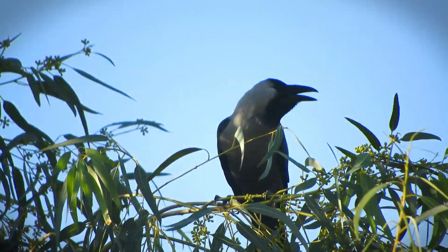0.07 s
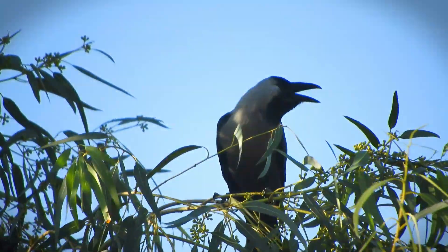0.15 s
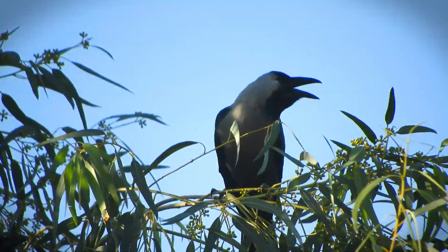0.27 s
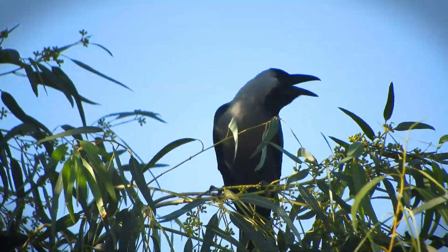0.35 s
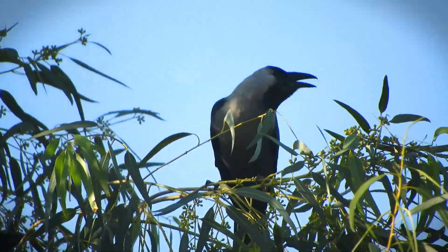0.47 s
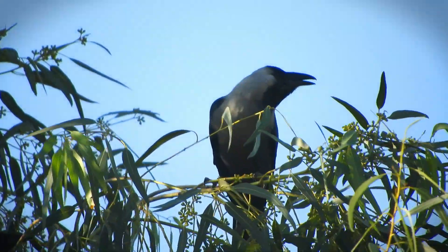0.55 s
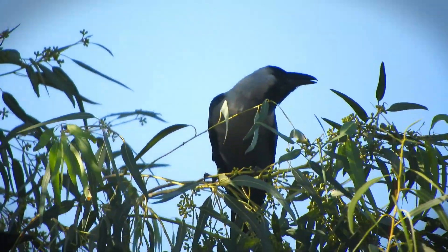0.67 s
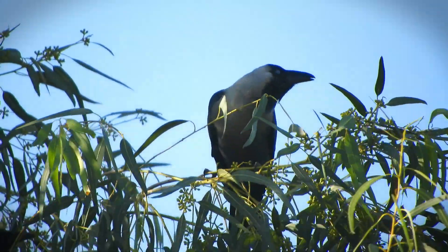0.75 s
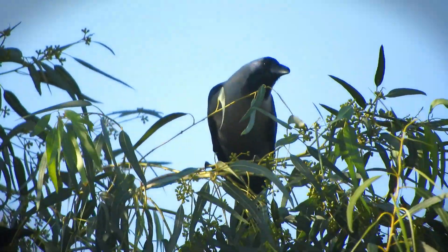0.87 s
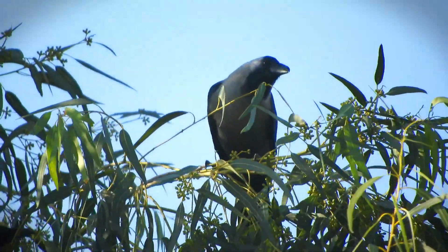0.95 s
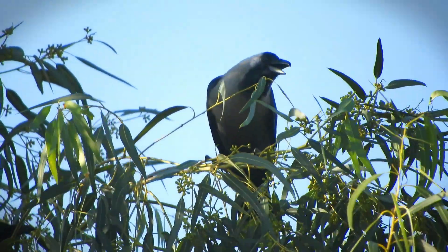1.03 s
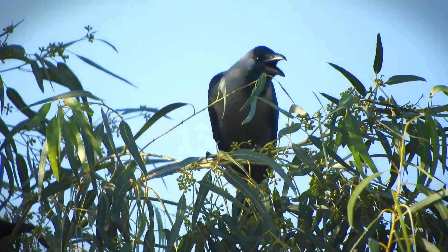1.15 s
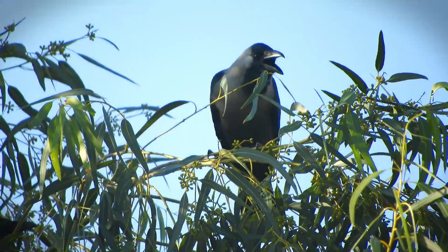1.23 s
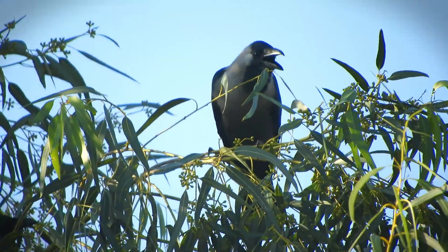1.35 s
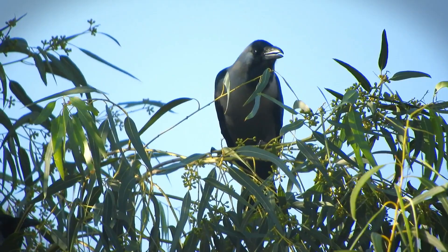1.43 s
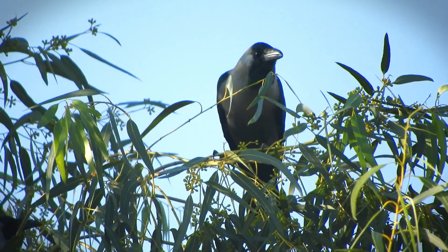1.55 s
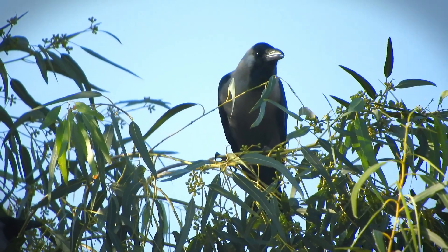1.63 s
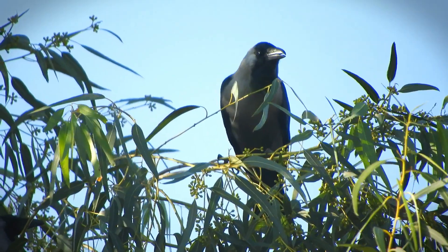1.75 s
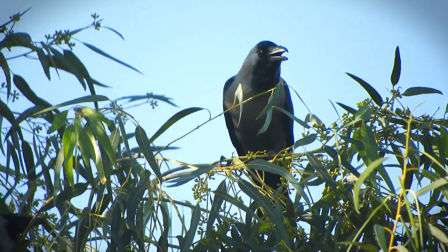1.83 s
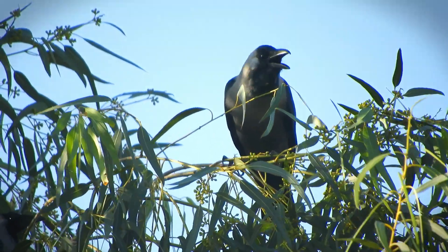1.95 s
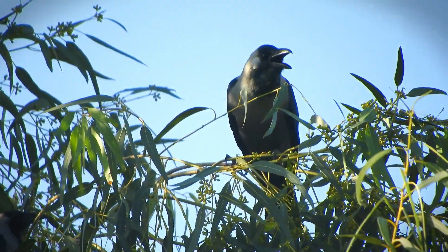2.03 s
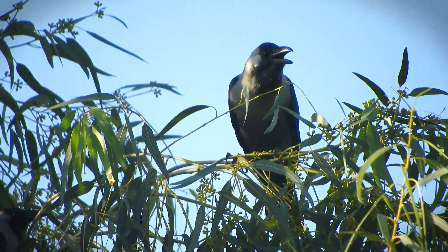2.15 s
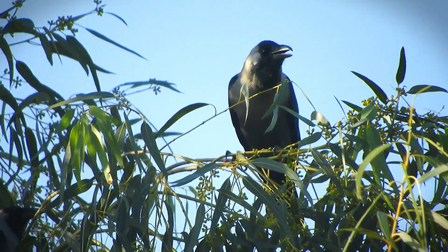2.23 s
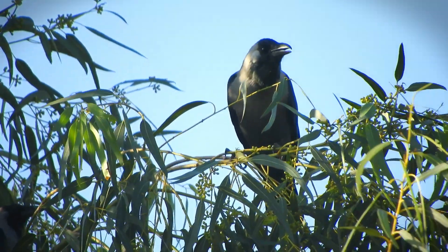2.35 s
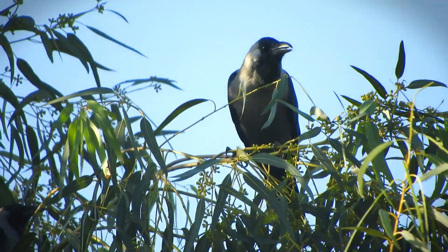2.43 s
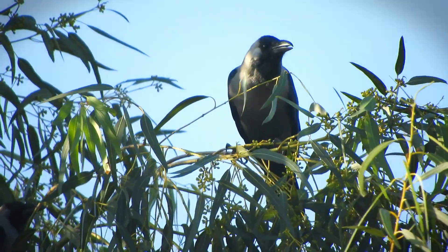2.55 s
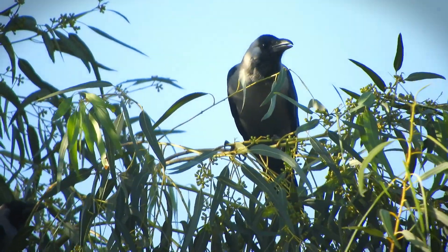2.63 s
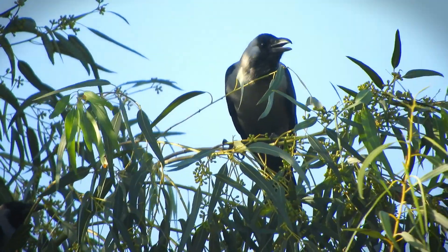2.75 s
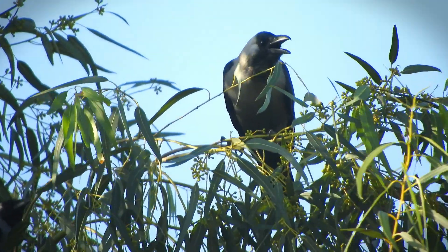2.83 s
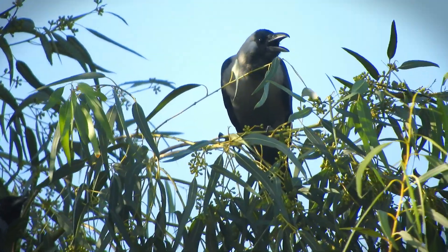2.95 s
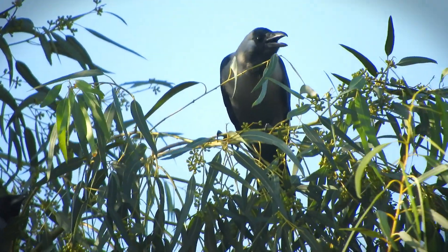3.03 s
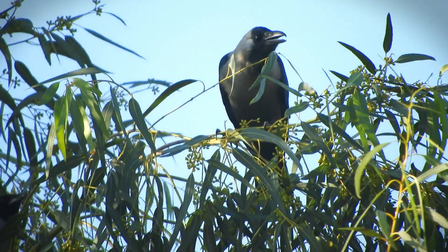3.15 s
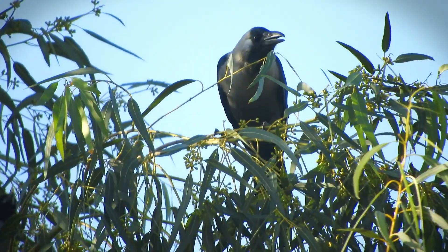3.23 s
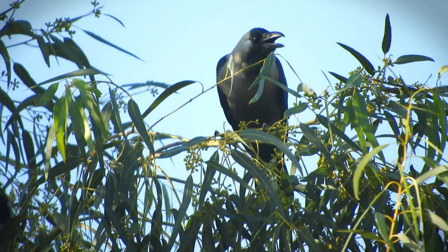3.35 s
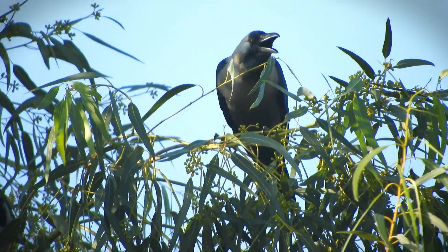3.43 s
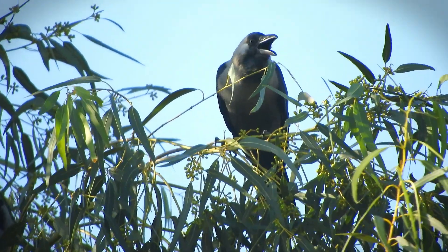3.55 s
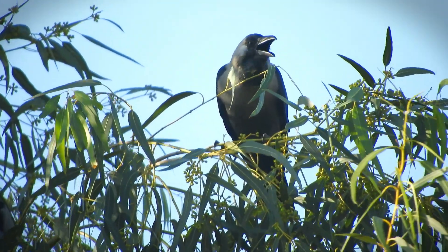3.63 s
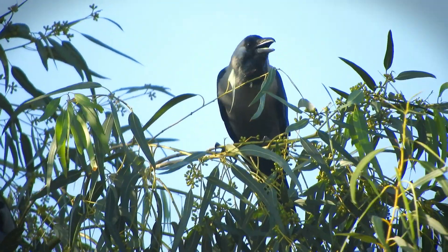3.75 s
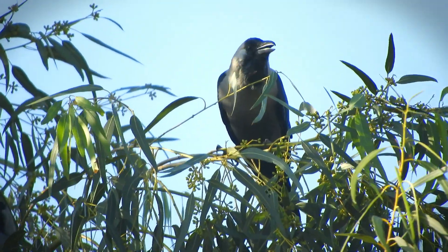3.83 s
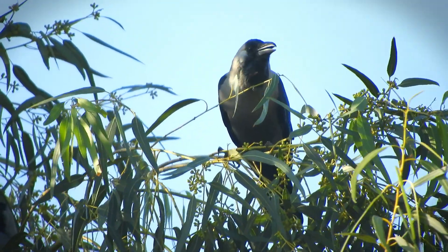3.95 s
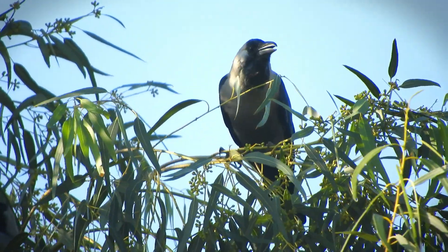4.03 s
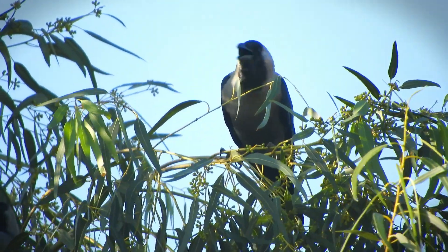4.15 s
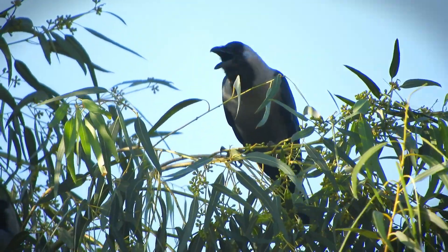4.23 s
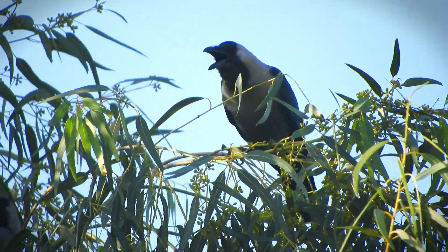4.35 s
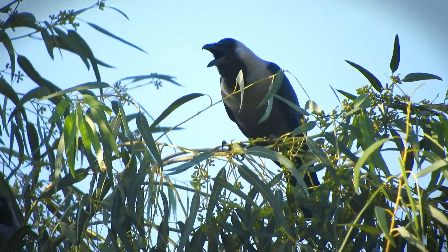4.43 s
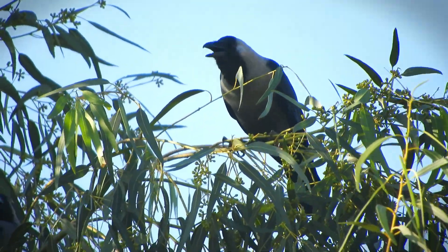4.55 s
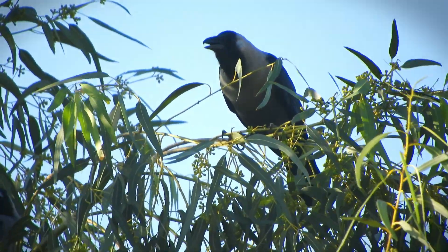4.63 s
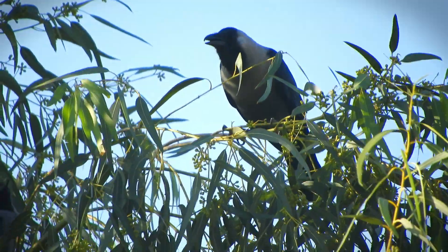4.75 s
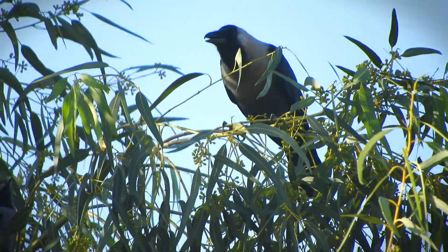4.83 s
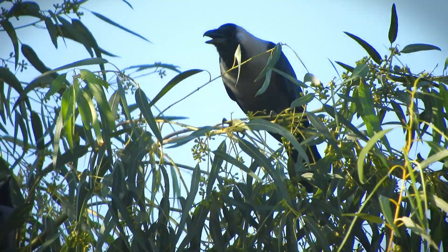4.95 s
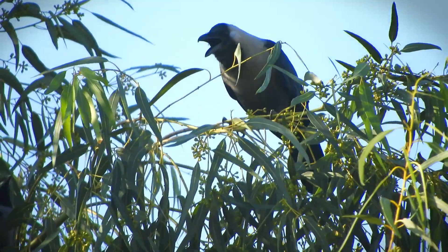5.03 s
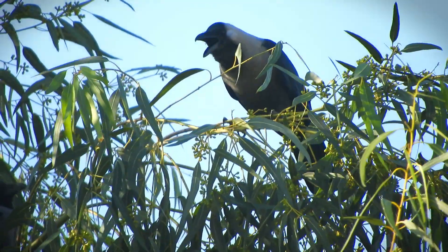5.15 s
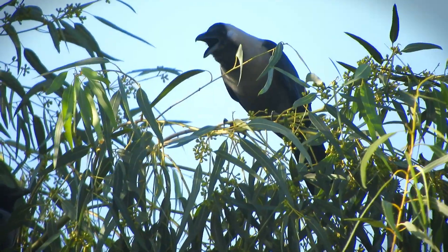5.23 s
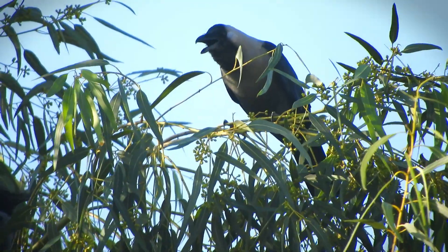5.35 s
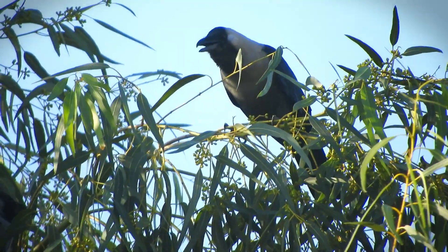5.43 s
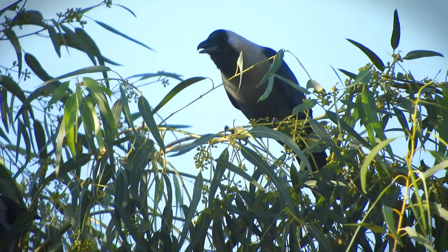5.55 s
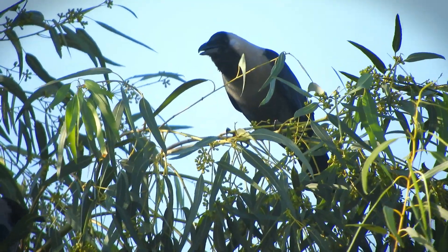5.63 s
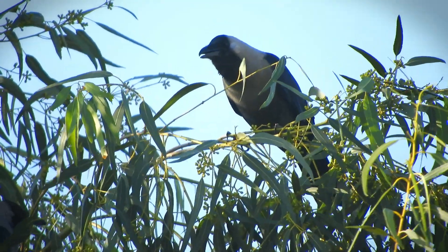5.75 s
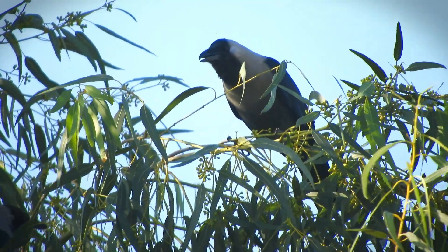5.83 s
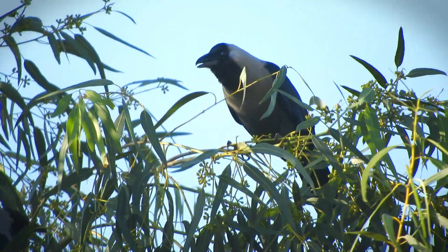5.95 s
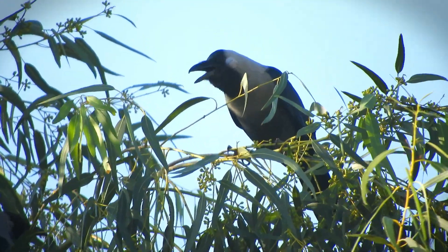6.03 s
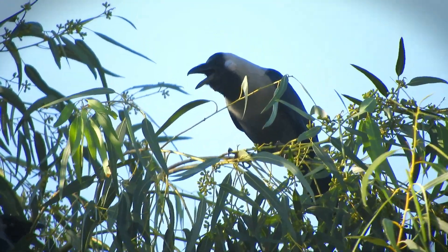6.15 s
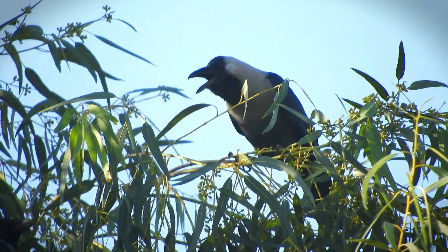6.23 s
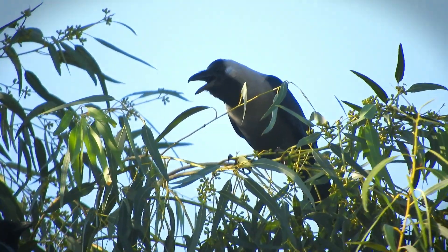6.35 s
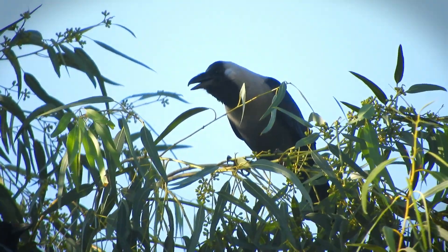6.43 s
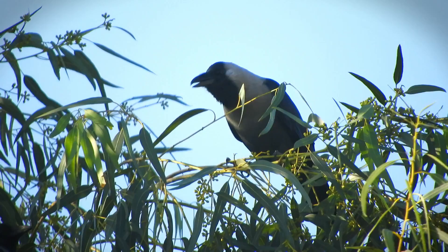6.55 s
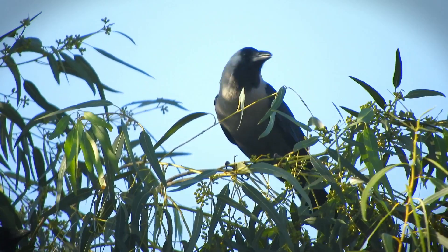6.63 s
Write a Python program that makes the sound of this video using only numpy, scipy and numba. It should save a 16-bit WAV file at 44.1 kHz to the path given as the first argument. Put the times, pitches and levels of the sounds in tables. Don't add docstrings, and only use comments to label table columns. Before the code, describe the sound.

Outdoors, hoarse fluttering crow caws, each around a quarter to half a second, come from straight ahead. They start moderate, pause briefly, build to the loudest cries around four seconds, then crowd together until the end. Thin, bright sparrow chirps and small whistles fill the gaps; very faint distant bird calls and dove coos sit behind. Soft wing puffs, a low traffic hum and leaf hiss complete the slightly echoing stereo scene.

```python
import sys
import numpy as np
from scipy import signal
from scipy.fft import rfft, irfft, next_fast_len
from scipy.io import wavfile
from scipy.ndimage import uniform_filter1d
from numba import njit

SR = 44100
rng = np.random.default_rng(int(sys.argv[2]) if len(sys.argv) > 2 else 0)


def unload_audio(sound):
    columns = np.transpose(np.atleast_2d(sound))
    steps = np.round(np.clip(columns, -1, 1) * 32767)
    wavfile.write(sys.argv[1], SR, steps.astype(np.int16))


def boost(x):
    u = np.asarray(x, float) / 20
    return 10 ** u


N = 294588

# start_s, crest_s, end_s, crest_hz, crest_db
CAWS = [(0.052, 0.189, .41, 387, -28.5), (0.307, 0.521, .69, 404.3, -23.5), (1.219, 1.44, 1.6, 402.5, -23),
        (1.36, 1.567, 1.75, 418, -24), (1.895, 2.101, 2.28, 434.2, -22.5), (2.117, 2.219, 2.4, 401.3, -23),
        (2.477, 2.72, 2.84, 434.6, -22.5), (2.97, 3.218, 3.39, 450.7, -19.5),
        (3.491, 3.798, 3.97, 455.7, -15.5), (3.997, 4.243, 4.35, 432.8, -21),
        (4.248, 4.484, 4.58, 443.2, -13.5), (4.453, 4.573, 4.76, 425.8, -20),
        (4.659, 4.877, 5.06, 454.5, -19), (4.946, 5.037, 5.24, 424, -24), (5.13, 5.392, 5.51, 424.6, -17.5),
        (5.4, 5.523, 5.745, 443, -18.5), (5.706, 5.853, 6.0, 402.5, -24.5),
        (6.076, 6.304, 6.51, 449.8, -18.5), (6.33, 6.434, 6.65, 405, -23.5), (6.6, 6.69, 6.9, 399.5, -36)]
# voice_cycles_per_flutter, throat_hz, final_pitch_drop_0_to_1, windpipe_db, hiss_db
CAW_VOICES = [(5.3, 1757, .14, -19.5, -19), (5.5, 1695, 0.3, -20, -28), (5.4, 1624, 0.02, -23, -24),
              (5.3, 1815, .13, -16.5, -17), (5.4, 1766, 0, -15.5, -17), (6.8, 1690, 0.4, -22, -23.5),
              (5.2, 1780, 0.4, -15, -18), (5.9, 1797, .06, -16.5, -17.5), (5.75, 1828, 0, -16, -19.5),
              (5.3, 1810, .06, -10.5, -23), (5.6, 1796, 0, -13, -23.5), (5.4, 1740, .07, -22, -24),
              (4.3, 1880, .12, -13, -23.5), (3.4, 1804, 0, -16, -20), (7.1, 1702, 0.4, -16, -23),
              (6.4, 1840, .12, -14, -23), (6.4, 1796, 0, -17.5, -16), (5.8, 1790, 0.2, -13, -24.5),
              (4.1, 1870, 0.4, -28, -21.5), (4.9, 1520, .01, -18, -18)]
CAW_ROUGHNESS = [.45, .16, .24, .34, .4, .28, .45, .36, .44, .18, .32, .28, .17, .32, .34, .18, .26, .18,
                 .3, .35]
# share_of_throat_hz, width_hz, level_db
THROAT = [
    (1.0, 300, 5.5),
    (1.24, 315, -7.5),
    (1.55, 583, -19.5),
]
# pitch_hz, level_db (per Hz)
BREATH_HISS = [(1650, -23), (2800, -23), (3550, -12.5), (3840, -5), (5890, -4), (8070, -10), (10000, -17.5),
               (13500, -25), (15500, -56)]
# time_s, pitch_hz
SPARROW_SYLLABLES = [
    [(0, 3300), (.004, 5300), (.008, 6400), (.013, 5000), (.018, 4900)],
    [(.023, 3600), (.031, 4850), (.04, 4950), (.045, 4150), (.05, 4400), (.055, 3150), (.059, 3850),
     (.064, 3200)],
    [(.063, 3200), (.072, 4000), (.086, 4150), (.102, 3150)],
]
# time_s, pitch_hz, level_db
HOOK_CHIRP = [(0, 3700, -18), (.005, 5000, -3), (.009, 5400, 0), (.02, 3700, -3), (.03, 3150, -1),
              (.043, 3800, -3), (.053, 3100, -4), (.062, 2300, -15)]
# time_s, pitch_hz, level_db
SLIDE_CHIRP = [(.02, 4900, -14), (.045, 3400, -4), (.062, 2700, -5), (.078, 2550, 0), (.117, 2550, -2),
               (.125, 2300, -6), (.14, 1950, -5), (.148, 2100, -20)]
# start_s, stretch_factor, pitch_factor, pause_before_arch_s, level_db
SPARROW_PHRASES = [(1.028, .96, .86, .016, -24), (1.922, .98, 1.01, 0, -23), (2.865, 1.01, .94, .003, -24),
                   (5.512, 1.07, 1.01, .003, -21), (5.977, .94, 1.02, 0, -22.5), (6.47, 1.01, .93, 0, -23)]
# start_s, stretch_factor, pitch_factor, level_db
HOOKS_SUNG = [(.007, 1.1, 1, -27), (3.973, 1, 1, -27), (3.213, .85, .92, -29)]
# start_s, stretch_factor, pitch_factor, level_db
SLIDES_SUNG = [(2.375, .9, 1, -43), (5.335, .85, 1, -27), (5.917, 1, 1, -26)]
# start_s, length_s, start_hz, end_hz, level_db
WHISTLES = [(.005, .028, 2650, 2600, -33), (.318, .042, 7500, 3200, -28), (1.021, .01, 3150, 3300, -36),
            (1.087, .014, 3250, 3450, -28), (2.94, .03, 3850, 3300, -30), (4.7, .02, 5200, 4100, -34),
            (4.72, .025, 3850, 3350, -27), (5.055, .05, 3550, 3350, -31), (5.785, .025, 2900, 2850, -31),
            (6.05, .03, 4950, 4100, -29), (6.51, .07, 2800, 2800, -34)]
# start_s, length_s, ends_hz, middle_hz, level_db
ARCHED_WHISTLES = [(.382, .042, 3150, 4400, -27), (3.465, .045, 2950, 2700, -38),
                   (4.755, .018, 2400, 2750, -28), (4.775, .018, 2400, 2750, -27),
                   (4.797, .02, 2450, 2800, -29), (4.96, .03, 3000, 4900, -27),
                   (5.0, .035, 2800, 3500, -36), (5.045, .055, 3150, 2850, -35),
                   (5.115, .035, 3400, 2900, -33)]
# start_s, length_s, start_hz, end_hz, level_db, strongest_overtone (number)
FAR_CALLS = [
    (1.74, .2, 690, 740, -43, 1.3),
    (2.28, .34, 845, 835, -38, 2.6),
    (2.83, .19, 800, 790, -39, 1.7),
    (2.85, .22, 3150, 3110, -47, 1),
    (2.4, .2, 3400, 3380, -56, 1),
]
# start_s, level_db, pitch_hz, length_s
COOS = [(0.706, -38.5, 349, 0.055), (1.196, -40, 383, 0.054), (1.319, -34.5, 380, 0.055),
        (4.359, -45, 368, 0.059), (4.412, -30.5, 379, 0.056), (5.07, -30.5, 384, 0.046),
        (5.698, -35.5, 376, 0.09), (6.118, -28.5, 366, 0.042)]
# start_s, level_db
WING_BEATS = [(0.712, -65), (5.198, -27), (5.217, -26), (5.242, -32.5), (5.339, -30), (5.36, -41),
              (6.138, -35)]
# pitch_hz, level_db (per Hz)
TOWN_HUM = [(15, -69), (25, -18.5), (86, -3), (145, -4.5), (193, 2.5), (237, -15), (357, -10), (622, -18.5),
            (663, -13), (1100, -44), (1430, -65), (2420, -120)]
# pitch_hz, level_db (per Hz)
TOWN_SIDE = [(15, -63), (25, -16), (75, -17), (132, -1.5), (215, -11.5), (825, -12), (2000, -10),
             (6900, -17.5), (15500, -34.5)]
# pitch_hz, level_db (per Hz)
LEAVES = [(530, -38), (900, -3), (1650, 3), (2720, -7.5), (3620, -4.5), (7400, -8), (7940, -9.5),
          (15500, -28)]
# time_s, level_db (above the hum)
RUMBLES = [
    (.12, 2),
    (5.24, 7),
]

ATTACK_S, RELEASE_S, SWELL_DB, SAG_DB = 0.073, 0.067, 13, 10.5
CLIMB_PER_S2 = 2.9
EDGE_DB = -7
EARLY_HISS_DB, LATE_HISS_DB, LATE_PIPE_DB = -5, -3, 3.5
FLUTTER_DEPTH = .085
GAP_DEPTH, GAP_SHARPNESS = 1.05, 3.5
OVERTONE_SPREAD = .9
BREATH = 1.6
WINDPIPE_WIDTH_HZ, THIRD_WIDTH_HZ = 200, 260
THIRD_DB, THIRD_DB_PER_ROUGH = -17, 10
BEAK_HZ, BEAK_WIDTH_HZ = 4300, 220
BEAK_DB, BEAK_DB_PER_ROUGH = 4, -31.5
HISS_OVERTONE, HISS_WIDTH_HZ, HISS_OPEN_DB = 14.07, 7300, -4
TOWN_DB, TOWN_SIDE_DB, LEAVES_DB, RUMBLE_S = -44.5, -50.5, -50, 0.044
ECHO_T60_S, ECHO_DB, FAR_ECHO_DB = 0.67, -15, -11
ECHO_SIDE_DB, ECHO_SIDE_SLOPE_DB = -17, -2.5


def unit(x):
    return x / np.sqrt(np.mean(x ** 2))


def ring(x, hz, width):
    b, a = signal.iirpeak(hz, hz / width, fs=SR)
    return signal.lfilter(b, a, signal.lfilter(b, a, x))


@njit
def moving_ring(x, hz, width):
    y = x.copy()
    for _ in range(2):
        band, low = 0., 0.
        for i in range(len(x)):
            g, damping = np.tan(np.pi * hz[i] / SR), width / hz[i]
            v = (band + g * (y[i] - low)) / (1 + g * (g + damping))
            band = 2 * v - band
            low = low + 2 * g * v
            y[i] = damping * v
    return y


def coloured(spectrum):
    hz, db = np.transpose(spectrum)
    size = next_fast_len(N)
    bins = np.arange(size // 2 + 1) * SR / size + 1
    gain = boost(np.interp(np.log(bins), np.log(hz), db))
    return unit(irfft(rfft(rng.standard_normal(size)) * gain, size)[:N])


def walk(rate):
    hold = int(SR / rate)
    steps = np.repeat(rng.standard_normal(N // hold + 1), hold)
    return unit(uniform_filter1d(uniform_filter1d(steps, hold), hold)[:N])


def add(out, x, s):
    i = int(s * SR)
    out[i:i + len(x)] += x[:N - i]


def caw(call, voice, rough, chance):
    start, crest, end, crest_hz, crest_db = call
    cycles, throat_hz, fall, pipe_db, hiss_db = voice
    first = int(start * SR)
    t = np.arange(first, min(int(end * SR), N)) / SR
    jitter, wander, shimmer, breath, hiss = chance[:, first:][:, :len(t)]

    before = np.clip((crest - t) / (crest - start), 0, 1) ** 2.2
    after = np.clip((t - crest) / (end - crest), 0, 1) ** 2.1
    hz = crest_hz * (1 - CLIMB_PER_S2 * (crest - start) ** 2 * before - fall * after)
    edge_db = EDGE_DB * (before + after)
    beak_db = BEAK_DB + BEAK_DB_PER_ROUGH * rough
    third_db = THIRD_DB + THIRD_DB_PER_ROUGH * rough
    rough = rough * (1 + 0.83 * (before + after))
    least_rough = rough.min()

    flutter = 2 * np.pi * np.cumsum(hz / cycles * (1 + 0.1155 * rough * wander)) / SR
    swing = FLUTTER_DEPTH * np.sin(flutter) + 0.038 * np.sin(2 * flutter + 0.033)
    unsteady = 0.0756 * rough * jitter + 0.0303 * rough * wander
    phase = 2 * np.pi * np.cumsum(hz * (1 + swing + unsteady)) / SR

    gap = np.clip(GAP_DEPTH - rough, 0, 1) * np.exp(GAP_SHARPNESS * (np.cos(flutter + 2.39) - 1))
    strength = (1 - gap) * boost(3.47 * rough * shimmer)
    tones = unit(sum(np.cos(k * phase + OVERTONE_SPREAD * k ** 2) for k in range(2, 12)))
    source = strength * (tones + BREATH * rough * breath)

    centre = throat_hz * (hz / crest_hz) ** 0.51 * (1 + 0.081 * rough * wander)
    throat = 0
    for k, (share, width, db) in enumerate(THROAT):
        level = boost(db + min(k, 1) * edge_db)
        throat = throat + (-1) ** k * level * moving_ring(source, share * centre, 1. * width)
    third = unit(moving_ring(source, 3 * hz, THIRD_WIDTH_HZ + 500 * least_rough))
    throat = unit(throat) - boost(third_db + edge_db) * third
    pipe = unit(moving_ring(source, (2 - 0.52 * least_rough) * hz, WINDPIPE_WIDTH_HZ + 700 * least_rough))

    puffs = (1 + .3 * np.cos(flutter - 1.5)) * (1 + .2 * np.cos(phase)) * boost(1.5 * rough * shimmer)
    air = moving_ring(hiss, HISS_OVERTONE * hz, 1. * HISS_WIDTH_HZ) + boost(HISS_OPEN_DB) * hiss
    beak = unit(ring(source * puffs, BEAK_HZ, BEAK_WIDTH_HZ))
    top = unit(puffs * air) + boost(beak_db - 1.5) * beak

    ramp = np.clip(np.minimum((t - start) / ATTACK_S, (end - t) / RELEASE_S), 0, 1)
    fade = np.sin(np.pi / 2 * ramp) ** 2
    effort = fade * boost(crest_db - SWELL_DB * before - SAG_DB * after)
    pipe_level = boost(pipe_db + EDGE_DB * before + LATE_PIPE_DB * after)
    top_level = boost(hiss_db + 4.0 + EARLY_HISS_DB * before + LATE_HISS_DB * after)
    return effort * (throat + pipe_level * pipe + top_level * top)


def crow_unsteadiness():
    return np.array([walk(500), walk(60), walk(200), rng.standard_normal(N), coloured(BREATH_HISS)])


def crows():
    out = np.zeros(N)
    birds = [crow_unsteadiness() for _ in range(2)]
    for k, (call, voice, rough) in enumerate(zip(CAWS, CAW_VOICES, CAW_ROUGHNESS)):
        add(out, caw(call, voice, rough, birds[k % 2]), call[0])
    return out


def whistle(s, hz, db):
    t = np.arange(0, s[-1], 1 / SR)
    path = uniform_filter1d(np.interp(t, s, hz), size=50)
    tremble = 1 + 0.032 * np.sin(2 * np.pi * 140 * t)
    phase = 2 * np.pi * np.cumsum(path * tremble) / SR
    return boost(np.interp(t, s, db)) * (np.sin(phase) + boost(-28) * np.sin(2 * phase))


def soft_whistle(s, hz, db):
    edges = np.zeros(len(s))
    edges[[0, -1]] = -12
    return whistle(s - s[0], hz, db + edges)


def sparrows(out):
    for at, stretch, factor, pause, db in SPARROW_PHRASES:
        keys, waits = (factor, factor, 1), (0, 0, pause)
        for syllable, own_db, key, wait in zip(SPARROW_SYLLABLES, (-6, -3, -3), keys, waits):
            s, hz = np.transpose(syllable)
            add(out, soft_whistle(s * stretch, hz * key, db + own_db), at + s[0] * stretch + wait)


def other_chirps(out):
    for phrase, sung in ((HOOK_CHIRP, HOOKS_SUNG), (SLIDE_CHIRP, SLIDES_SUNG)):
        s, hz, db = np.transpose(phrase)
        for at, stretch, factor, top_db in sung:
            add(out, whistle((s - s[0]) * stretch, hz * factor, db + top_db), at + s[0] * stretch)
    share = np.linspace(0, 1, 7)
    for table, path in ((WHISTLES, share), (ARCHED_WHISTLES, np.sin(np.pi * share))):
        for at, length, hz0, hz1, db in table:
            add(out, soft_whistle(length * share, hz0 + (hz1 - hz0) * path, db - 4.0), at)


def small_birds():
    out = np.zeros(N)
    sparrows(out)
    other_chirps(out)
    out = out * boost(2.3 * walk(300))
    return out + boost(-12) * np.roll(out, int(.009 * SR)) + boost(-16) * np.roll(out, int(.021 * SR))


def wings():
    out = np.zeros(N)
    t = np.arange(0, .06, 1 / SR)
    puff = t / 0.0073 * np.exp(1 - t / 0.012)
    for (at, db), air in zip(WING_BEATS, rng.standard_normal((len(WING_BEATS), len(t)))):
        add(out, boost(db - 8.5) * unit(ring(air, 324, 330)) * puff, at)
    return out


def far_birds():
    out = np.zeros(N)
    for at, length, hz0, hz1, db, strongest in FAR_CALLS:
        phase = 2 * np.pi * np.cumsum(np.linspace(hz0, hz1, int(length * SR))) / SR
        tones = sum(boost(-11 * abs(k - strongest)) * np.sin(k * phase) for k in (1, 2, 3))
        add(out, boost(db) * np.hanning(len(phase)) ** .5 * tones, at)
    for at, db, hz, length in COOS:
        t = np.arange(0, length, 1 / SR)
        add(out, boost(db) * np.hanning(len(t)) * np.sin(2 * np.pi * hz * t), at)
    return out * boost(2.5 * walk(60))


def town():
    t = np.arange(N) / SR
    rumble_db = sum(db * np.exp(-((t - s) / RUMBLE_S) ** 2) for s, db in RUMBLES)
    hum = coloured(TOWN_HUM) * boost(TOWN_DB + rumble_db + 1.0 * walk(4.86))
    leaves = coloured(LEAVES) * boost(LEAVES_DB + 0.5 * walk(4.92))
    return hum + leaves, coloured(TOWN_SIDE) * boost(TOWN_SIDE_DB)


def echoes(wet):
    t = np.arange(0, .8, 1 / SR)
    fade = boost(-60 * t / ECHO_T60_S) * np.clip(t / 0.006, 0, 1)
    tails = rng.standard_normal((2, len(t))) * fade
    return [signal.fftconvolve(wet, tail / np.linalg.norm(tail))[:N] for tail in tails]


def scene():
    near = crows() + wings()
    far = small_birds() + far_birds()
    echo, echo_side = echoes(boost(ECHO_DB) * near + boost(FAR_ECHO_DB) * far)
    hum, hum_side = town()
    mid = near + far + echo + hum
    side = boost(ECHO_SIDE_DB) * echo_side + boost(ECHO_SIDE_SLOPE_DB) * np.gradient(echo_side) + hum_side
    return np.array([mid + side, mid - side])


def band_limit(x):
    return signal.sosfilt(signal.butter(12, 15620, fs=SR, output="sos"), x)


def record(dry):
    soft = np.tanh(1.5 * dry) / 1.5
    low_pass = signal.ellip(8, .2, 60, 15400, fs=SR, output="sos")
    mix = signal.sosfilt(low_pass, soft)
    return band_limit(mix)


dry = scene()
out = record(dry)
unload_audio(out)
```